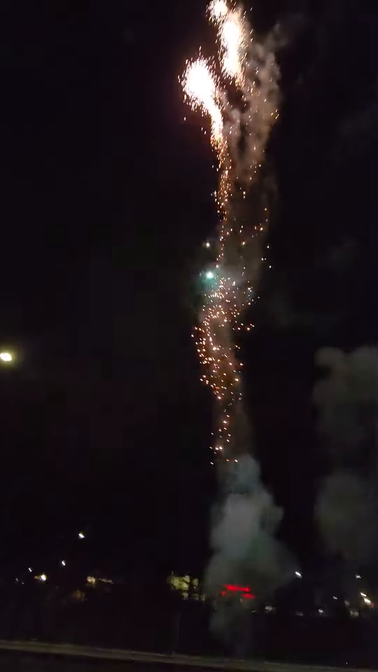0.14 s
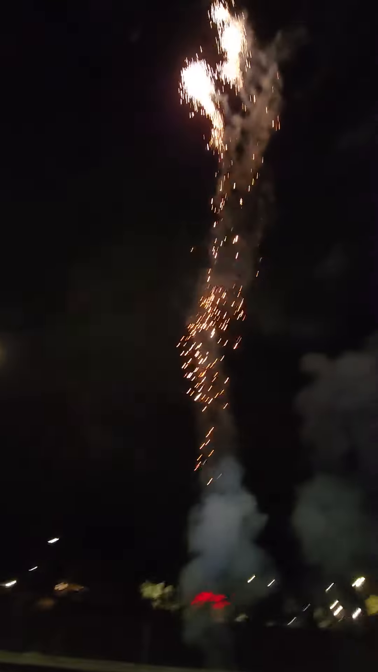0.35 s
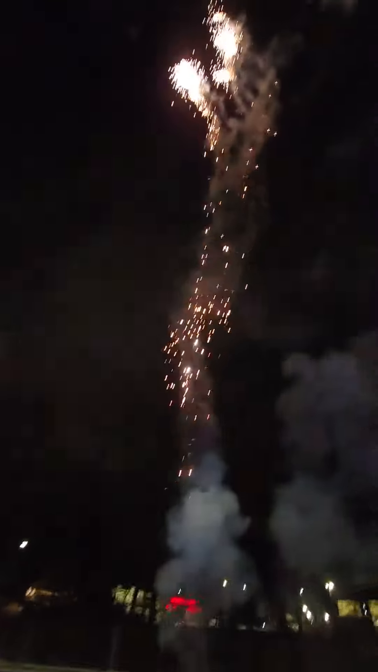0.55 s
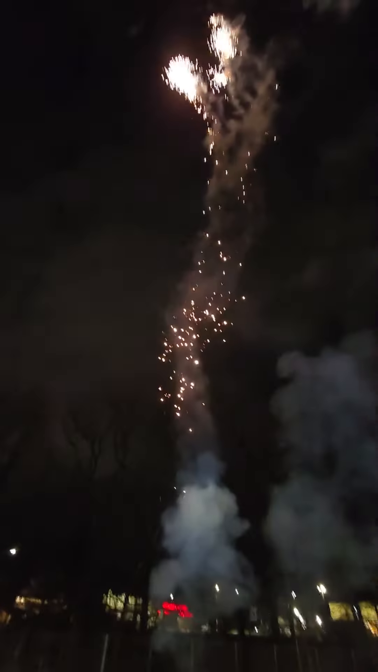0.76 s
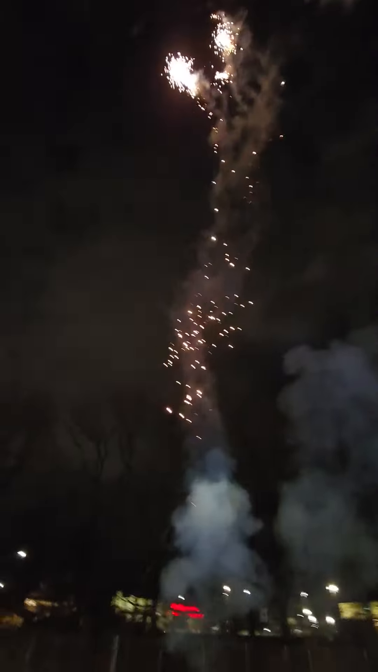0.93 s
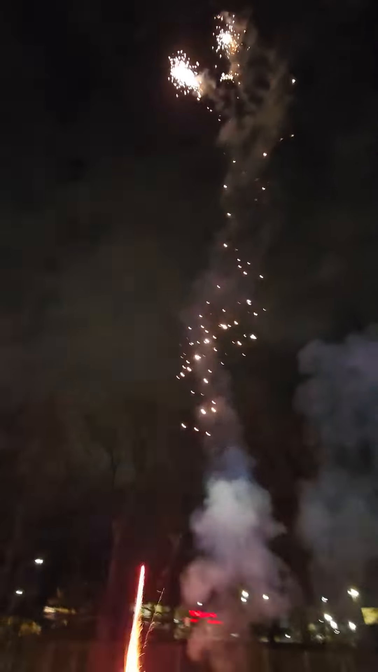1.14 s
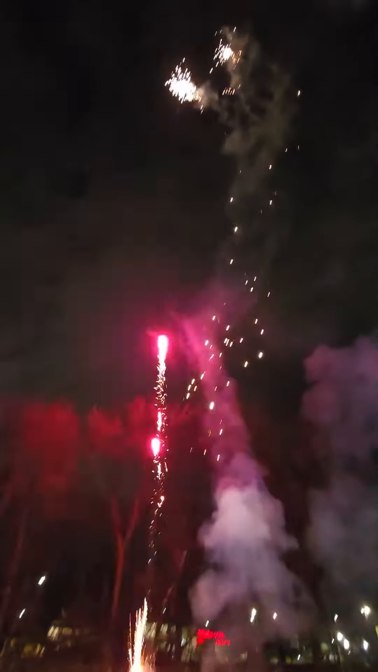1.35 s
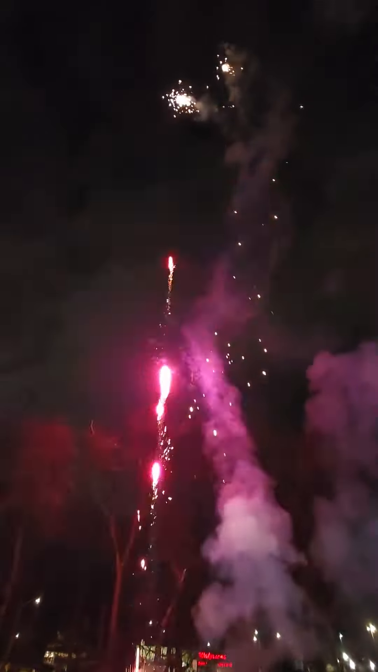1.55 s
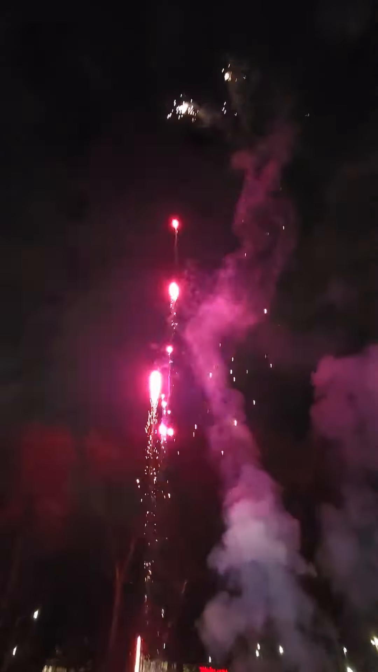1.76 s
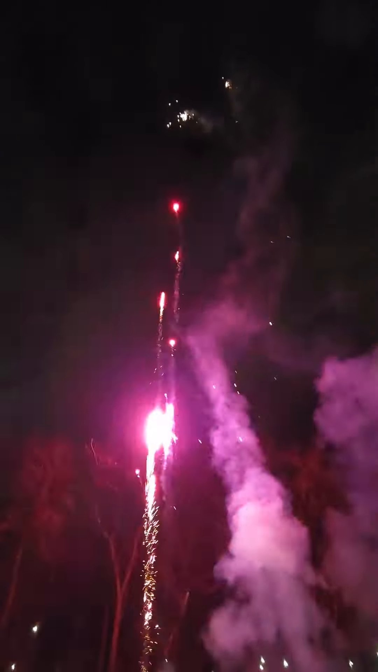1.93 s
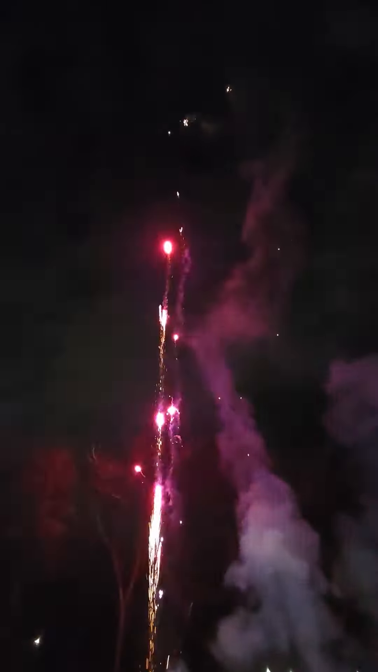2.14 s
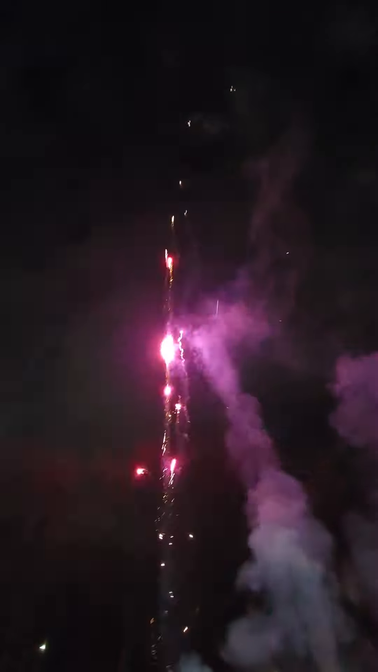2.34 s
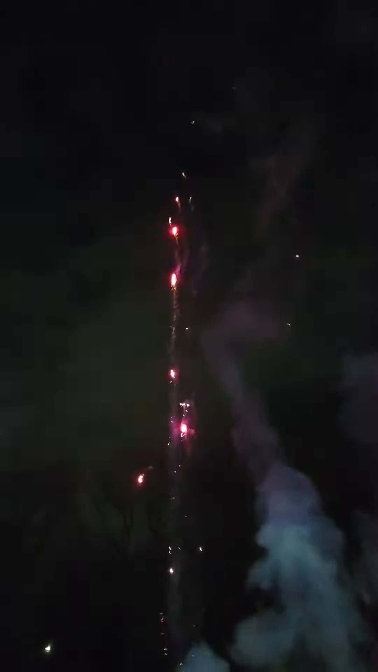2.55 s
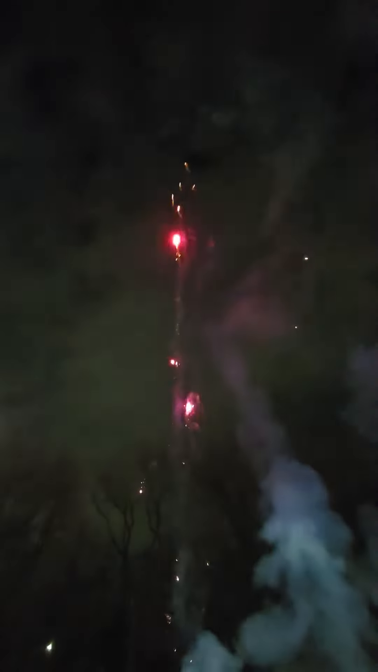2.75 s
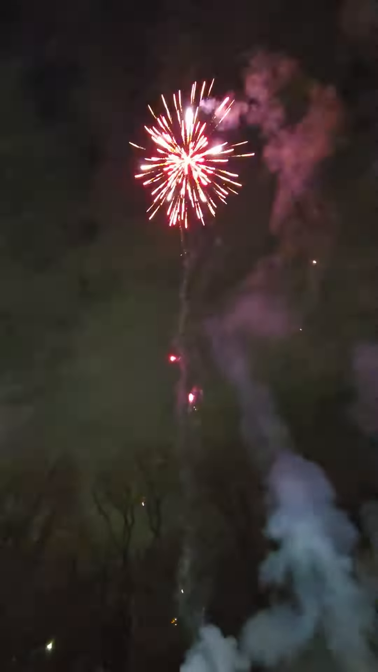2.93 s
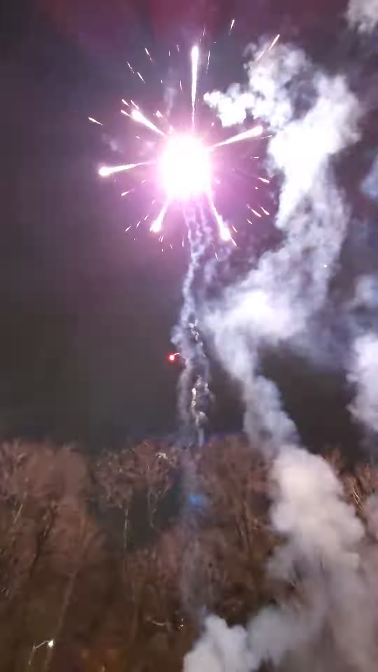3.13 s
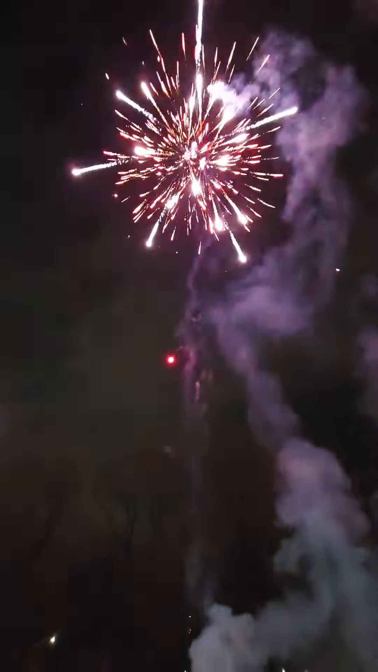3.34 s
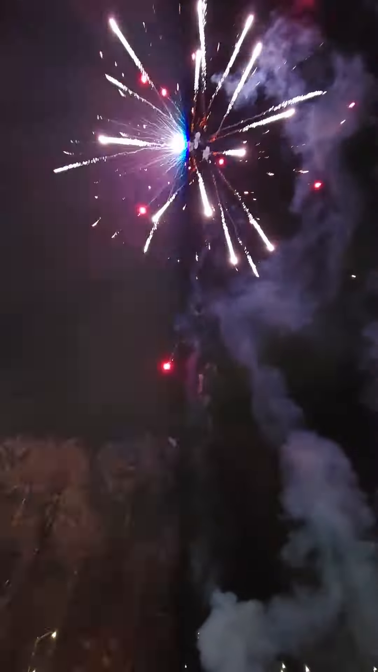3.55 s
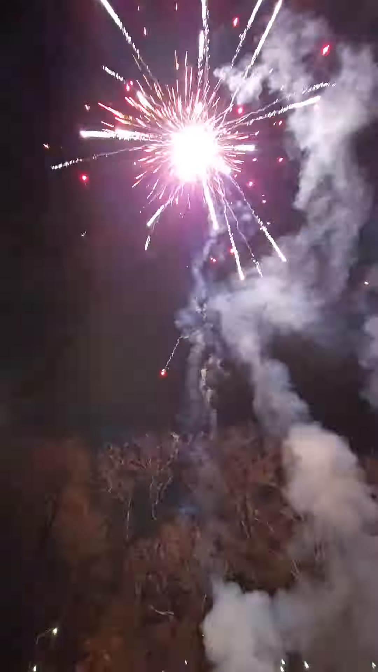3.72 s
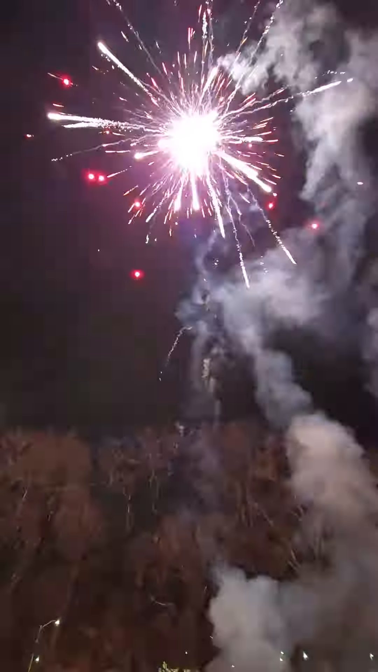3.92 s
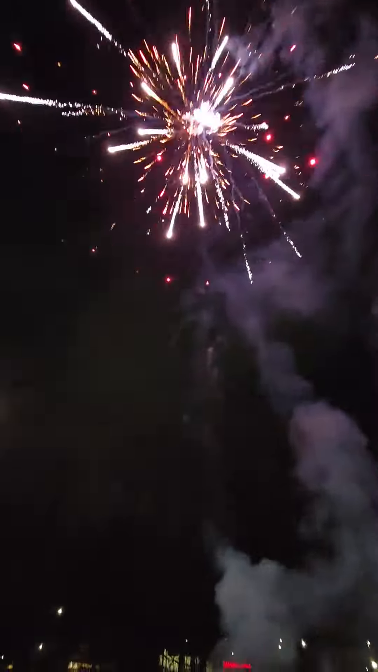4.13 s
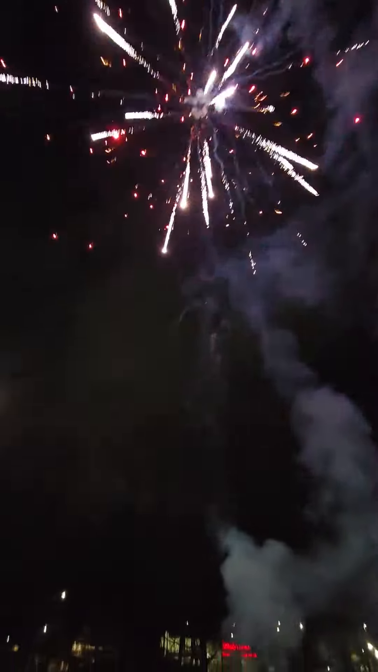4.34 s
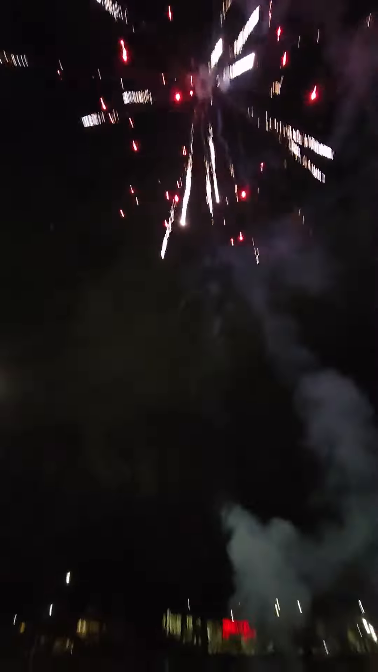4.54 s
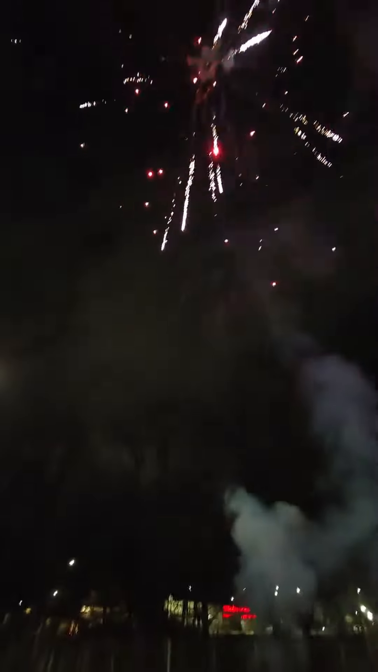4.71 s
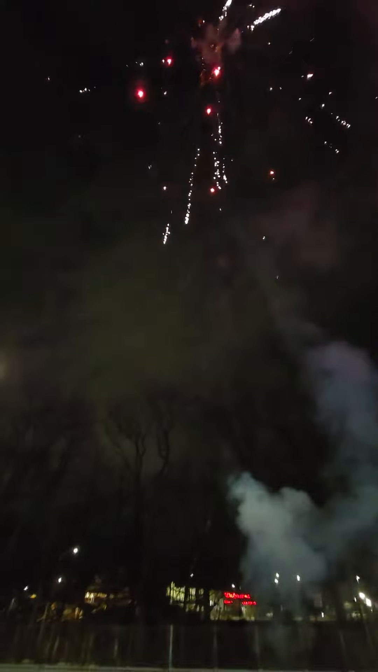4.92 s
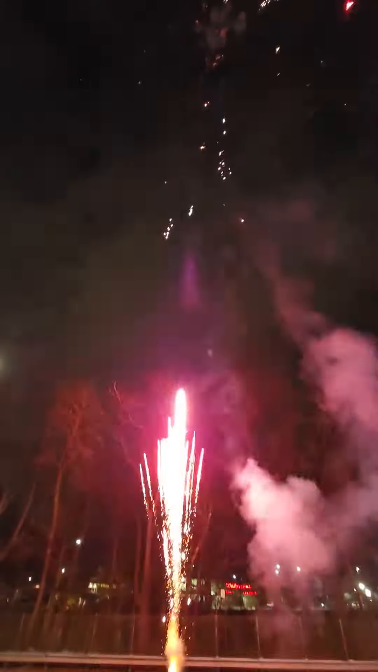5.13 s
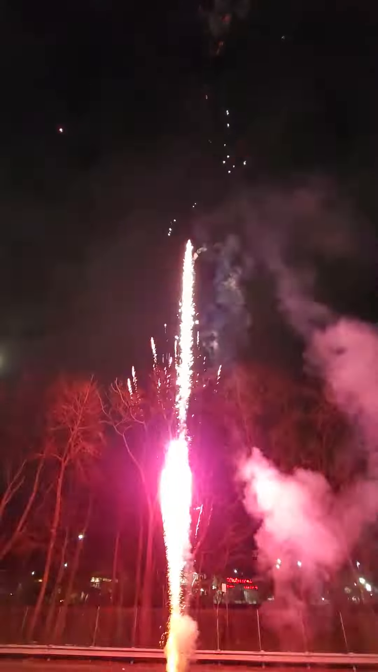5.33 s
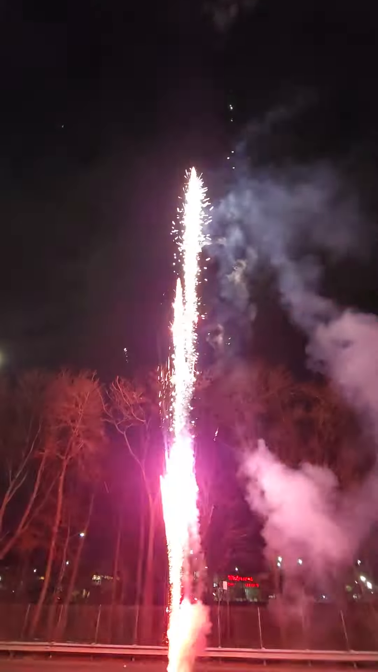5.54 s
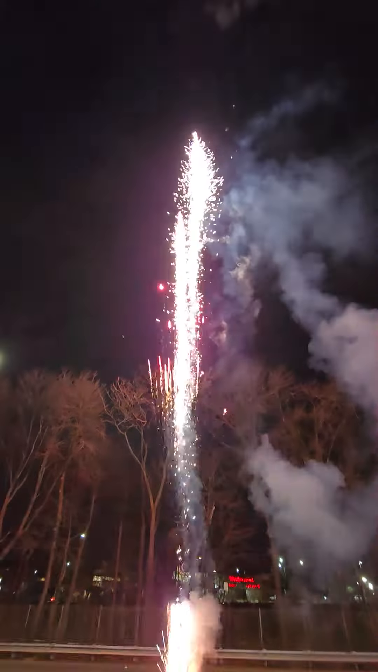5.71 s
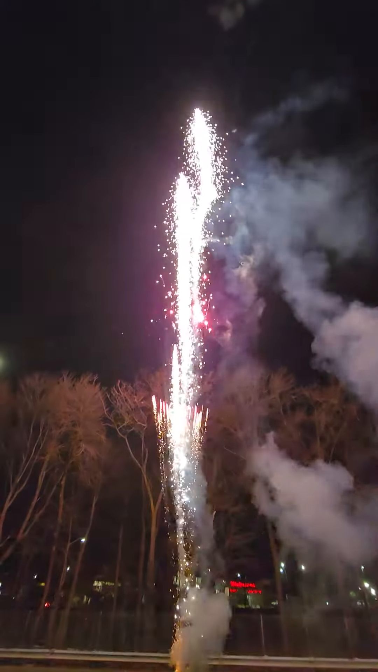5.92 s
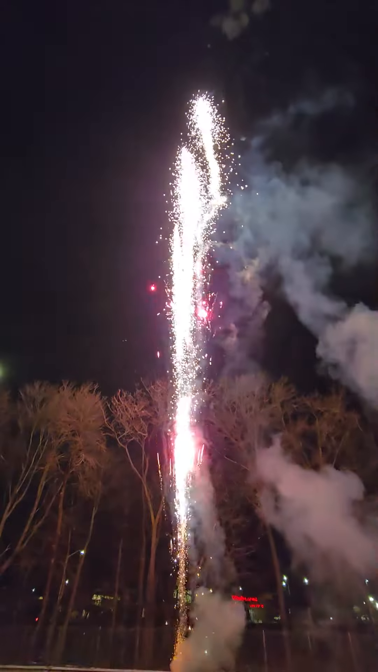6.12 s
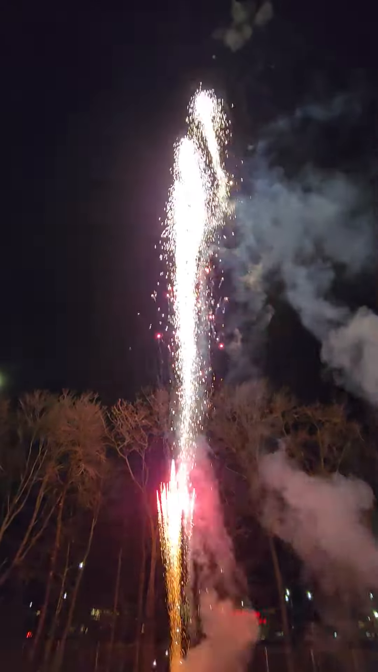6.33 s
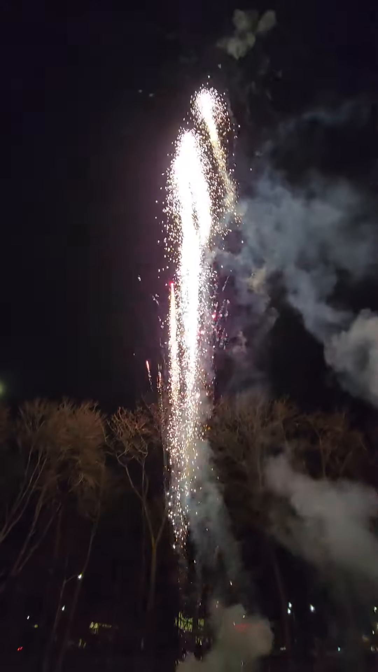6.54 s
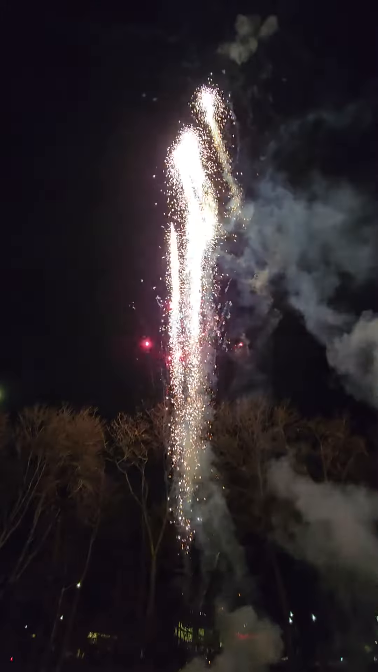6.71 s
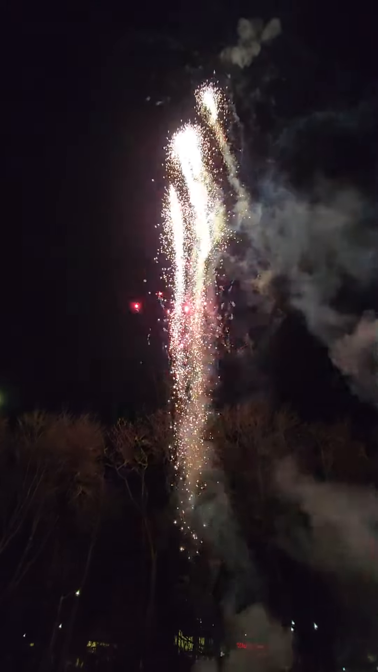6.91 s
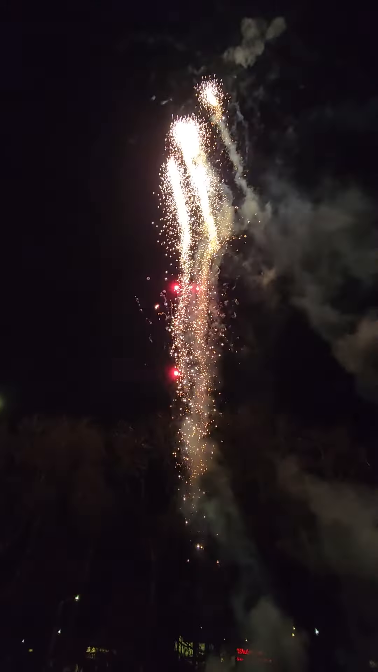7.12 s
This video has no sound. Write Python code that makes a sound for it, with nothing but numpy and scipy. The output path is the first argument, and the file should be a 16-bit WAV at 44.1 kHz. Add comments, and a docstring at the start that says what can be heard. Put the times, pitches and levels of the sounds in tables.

```python
"""A spray of sparks hisses and burns out at night beside a tree-lined street; shells leave their tubes and burst
overhead with a rolling echo; then six comets are fired, whose trails catch one by one and swell into a hissing fountain.
Every report is a blast wave with ragged cracks, a few distinct reflections and a diffuse tail of noise bands.
Sparks are coloured noise with ticks and pops; low-passed rumble, a puff of wind and a distant town lie beneath."""
import sys
import numpy as np
from scipy import signal
from scipy.fft import rfft, irfft
from scipy.io import wavfile

SR = 44100
rng = np.random.default_rng(int(sys.argv[2]) if len(sys.argv) > 2 else 0)


def bounce(signal):
    """Save signal as a 16-bit WAV file at the path given by the first command-line argument."""
    frames = np.transpose(np.atleast_2d(signal))
    limited = np.clip(frames, -1, 1)
    pcm = np.round(limited * 32767).astype(np.int16)
    wavfile.write(sys.argv[1], SR, pcm)


N = 320607
TIME = np.arange(N) / SR
EDGES = np.geomspace(22, 17000, 29)   # about a third of an octave apart
CENTRES = np.sqrt(EDGES[1:] * EDGES[:-1])
CUTOFF_HZ, HISS_DB = 16000, -77   # top of the spectrum; self-noise of the microphones

# In every colour table, density is the spectral density level before the sound is scaled to its level.
# Distant town [f/Hz, density/dB]
TOWN_COLOUR = [(59, -43), (100, -22), (210, -4.5), (335, -13), (2040, -19.5), (2900, -33), (5770, -41.5),
               (16000, -59)]
TOWN_DB = -52.5
# Low rumble [f/Hz, density/dB]
RUMBLE_COLOUR = [(25, 6), (45, 6.5), (70, 16.5), (100, 3.5), (160, -40), (400, -31), (16000, -86.5)]
# Rumble of the town, of the spray at full burn (with the share of its fading followed), and after each burst
TOWN_RUMBLE_DB, SPRAY_RUMBLE_DB, RUMBLE_FOLLOWS = -64, -47, 0.35
ROLL_DB, ROLL_BUILD_S, ROLL_T60_S = -45.5, 0.18, 4.4
# Puff of wind on the microphone [f/Hz, density/dB]
GUST_COLOUR = [(22, 8), (33, 0.5), (50, -6), (90, -17.5), (200, -26), (600, -57), (16000, -110)]
GUST_S, GUST_DB, GUST_ATTACK_S, GUST_HOLD_S, GUST_T60_S = 0.296, -32, 0.017, 0.18, 0.27

# Stereo width of diffuse sound [f/Hz, side minus mid level/dB]
WIDTH = [(40, -10.5), (130, -19.5), (260, -13), (500, -6), (1000, 3.5), (1600, 1), (2500, 0), (5000, 0.5),
         (16000, 0)]
# Stereo balance of diffuse sound [f/Hz, left minus right level/dB]
LEAN = [(40, -1), (130, -1), (300, 0), (1000, -0.5), (2200, -2), (4000, 1.4), (8000, 1.7), (16000, -0.5)]
# Reverberation of the street, before each volley's linger factor [f/Hz, t60/s]
NEAR_T60 = [(50, 1.8), (250, 0.55), (700, 0.92), (2200, 0.8239), (5000, 0.53), (9000, 0.42), (16000, 0.41)]
# Reverberation of the next rows of trees [f/Hz, t60/s]
MIDDLE_T60 = [(100, 0.8), (1000, 2.06), (2200, 1.65), (5000, 1.1), (16000, 0.41)]
MIDDLE_DB = -18   # against the street
# Reverberation from far away [f/Hz, t60/s]
FAR_T60 = [(50, 3.8), (300, 3.46), (1000, 5.35), (2500, 2.66), (5000, 0.96), (9000, 0.69), (16000, 0.63)]
# Spectral balance of the far roll, to which each volley adds its own level [f/Hz, level/dB]
FAR_DB = [(50, 10.5), (150, 13.5), (400, -6.5), (1000, -5.5), (2500, -4), (3500, 2), (6000, 12.5),
          (16000, -3)]
# Pitch of the echoes of shots from the street [f/Hz, width/Hz, level/dB]
STREET_RING = (240, 18, 5.4)
# Pitch of the echoes of bursts in the sky [f/Hz, width/Hz, level/dB]
SKY_RING = (415, 17, 3.1)
# Resonances of the right microphone port [f/Hz, width/Hz, level/dB]
PORT = [(2150, 174, 5), (3030, 290, 1)]
# Diffuse tails of lifts [f/Hz, density/dB]
LIFT_COLOUR = [(21, -40), (35, -18.5), (86, -12.5), (125, -5.5), (200, 0), (265, -0.5), (350, -5),
               (590, -11), (1000, -12), (1350, -17), (1850, -16), (2200, -19.5), (2600, -20), (3700, -20),
               (13000, -32.5), (16000, -38)]
# Diffuse tails of bursts [f/Hz, density/dB]
BURST_COLOUR = [(21, -52), (35, -31), (115, -17), (165, -11), (215, -6), (389, 1), (520, -6.5), (758, -16),
                (930, -10), (1170, -18.5), (1480, -15), (1860, -19.5), (2220, -20.5), (2660, -24),
                (4010, -26), (5740, -36), (14800, -34), (16000, -41)]
# Diffuse tails of comet shots [f/Hz, density/dB]
COMET_COLOUR = [(35, -24), (100, -10.5), (170, -2.5), (260, 0.5), (400, -10), (750, -8.5), (1300, -19.5),
                (2300, -18.5), (4000, -23), (7000, -34), (16000, -40)]

# Directional parts of the spark hiss [level/dB against the diffuse hiss, right ear lag/s]
HISS_PATHS = [(-11.5, -0.0036), (-11.5, -.00045)]
# First spray [f/Hz, density/dB]
SPRAY_COLOUR = [(60, -49), (125, -24.5), (177, -6.5), (270, -15), (358, -5.5), (430, -11), (600, -7),
                (1100, -5), (2100, -2), (2950, 1), (4000, -5), (6000, -6.5), (9000, -10.5), (16000, -22.5)]
# Burn of the first spray before its gain and burnout [t/s, level/dB]
SPRAY_BURN = [(0.0, -26), (0.142, -25), (0.158, -27.5), (0.26, -26.5), (0.73, -28.5), (0.746, -28),
              (0.828, -31.5), (0.832, -30), (1.042, -30.5), (1.062, -35), (1.076, -28.5), (1.144, -31.5),
              (1.152, -30), (1.22, -33)]
# Late bounce of the spray off the road [delay/s, level/dB, top f/Hz]
ROAD_BOUNCE = (.0056, -9, 710)
# Thinning sets the dulling, sputter, pops and rumble; burnout also lowers the hiss itself
SPRAY_GAIN_DB, SPRAY_HOLD_S, SPRAY_THIN_DB_PER_S = 3, 0.17, 3
BURNOUT_S, BURNOUT_DB_PER_S = 1.22, 38
SPRAY_TILT_DB, SPRAY_DULLING = -0.8, 0.3   # dB per octave at full burn; dB per octave lost per dB of fading
SPUTTER_DB_PER_DB, SPUTTER_PER_S = 0.54, 58   # the thinner the spray, the more unevenly it burns
SNAP_COUNT, SNAP_DB, SNAP_SPREAD_DB = 12, -24, 6   # larger grains: number, mean level at full burn, spread
# Comet fountain [f/Hz, density/dB]
FOUNTAIN_COLOUR = [(60, -22), (110, -27), (170, -6), (230, -10), (350, -5), (600, -4.5), (950, -3),
                   (1500, -0.5), (2150, -2), (2600, 0), (3300, 1.5), (5000, -4.5), (9000, -4.5),
                   (16000, -12)]
# A faint trail hisses thin and bright, a full fountain broader [level/dB, brightness/dB per octave]
TRAIL_TILT = [(-39, 1), (-18.5, -1)]
# A comet spits as it lights; its trail then catches, reaches full burn and slowly wanes
SPIT_DB, SPIT_FADE_DB_PER_S = -45.5, 64
CATCH_S, CATCH_DB_PER_S, WANE_DB_PER_S = 0.62, 69.5, 1
# Roar of the first shell as it climbs [f/Hz, density/dB]
ROAR_COLOUR = [(100, -23), (400, 9.5), (700, 0), (1300, 2), (2200, -13), (5000, -20), (16000, -31)]
ROAR_S, ROAR_ATTACK_S, ROAR_HOLD_S, ROAR_T60_S, ROAR_DB = 1.248, 0.025, 0.089, .25, -22.5

# Low thumps near the first report of each volley [t/s, 1/e half-width/s, left height, right height]
THUMPS = [(1.2273, 0.0036, -0.019, 0.33), (1.233, 0.001, -0.09, -0.5), (3.0381, 0.00076, -0.2, -0.45),
          (3.047, 0.0013, 0.027, 0.1), (5.1198, 0.00082, 0.11, 0.36)]
# Shells leaving their tubes, and one small crack after the first; a larger size booms lower
# [t/s, blast level/dB, crack level/dB, tail level/dB, tail brightness/dB per octave, size]
LIFTS = [(1.2359, -4.5, -8, -13, 1.16, 1.02), (1.3135, -26, -13.5, -24.5, -6, 1.5),
         (1.437, -2, -13, -13.5, 0, 0.97), (1.6576, -4.5, -10, -14.5, 0, 1.02),
         (1.846, -3.5, -11.5, -16.5, -0.5, 0.98), (1.9008, -6, -9.5, -18, 0.5, 1.12),
         (2.118, -4, -10, -18.5, 0.1, 1.1)]
# Shells bursting overhead
# [t/s, blast level/dB, crack level/dB, tail level/dB, tail brightness/dB per octave, size]
BURSTS = [(3.0409, -5.5, -22, -14.5, 0.5, 1.13), (3.343, -2.5, -20, -18.5, 1.5, 0.98),
          (3.3686, -0.5, -17.5, -18.5, 0.5, 1), (3.843, -3.5, -15, -18.5, 1, 1.04),
          (3.9728, -1, -14.5, -18.5, 0.5, 0.98), (4.187, -2.5, -15.5, -19, 0.5, 0.95)]
# Comets leaving their tubes
# [t/s, blast level/dB, crack level/dB, tail level/dB, tail brightness/dB per octave, size, trail hiss level/dB]
COMETS = [(5.1149, -9, -15.5, -28, 2, 1.1, -30.5), (5.345, -4, -21.5, -28, 0, 1.07, -31),
          (5.5716, -2.5, -17.5, -24.5, 0, 1.03, -26), (5.8193, -3, -18.5, -22.5, -0.5, 1.06, -27.5),
          (6.083, -4.5, -15.5, -22.5, 0, 1.05, -28), (6.3531, -1.5, -15, -21.5, 0.5, 0.87, -43)]
# Paths of lifts to the listener
# [delay/s, blast level/dB, top f/Hz, crack level/dB, crack t60/s, right ear lag of the blast/s]
LIFT_PATHS = [(0, -7, 6060, -7, 0.03, -.00038), (.0033, -18, 2000, -12, 0.017, -.0003),
              (0.0145, -28, 2490, -4, 0.037, -.0002), (0.017, -12, 2500, -3.5, .02, .0003),
              (.0365, -9.5, 1100, -13, 0.046, -.0003)]
# Paths of bursts
# [delay/s, blast level/dB, top f/Hz, crack level/dB, crack t60/s, right ear lag of the blast/s]
BURST_PATHS = [(0, -1.5, 7000, 1.5, 0.0082, .00033), (.0058, -4.5, 5000, 8.5, 0.0081, -.0003),
               (0.0111, -2.5, 696, -13, .02, .0003), (0.024, -14, 4000, -7, 0.0065, .0002),
               (0.0301, -14.5, 1000, -5, .012, -.0002), (.0415, -7.5, 1220, -32, 0.019, -.0002),
               (0.55, -36, 400, -46, 0.027, .0003)]
# Paths of comet shots
# [delay/s, blast level/dB, top f/Hz, crack level/dB, crack t60/s, right ear lag of the blast/s]
COMET_PATHS = [(0, -8.5, 9000, -1, 0.026, -.0003), (0.0157, -18.5, 2500, -1, 0.024, .0002)]
# Ringing set off by a lift, before stretching by size [f/Hz, level/dB, t60/s]
LIFT_RINGS = [(250, 4, 0.028), (512, -46, 0.019), (2300, -27, 0.02)]
# Ringing set off by a burst, before stretching by size [f/Hz, level/dB, t60/s]
BURST_RINGS = [(342, -6, 0.023), (420, -16.5, 0.079), (960, -15, 0.033), (2020, -18.5, 0.017)]
# Ringing set off by a comet shot, before stretching by size [f/Hz, level/dB, t60/s]
COMET_RINGS = [(247, 4, 0.027), (573, -11, 0.034), (870, -22, 0.015), (3120, -17, 0.011)]
# Cracks of bursts and pops of large grains [f/Hz, density/dB]
CRACK_COLOUR = [(200, -7), (600, 14), (1200, 3), (2100, 7), (3200, 1), (4500, -2), (7000, -16), (11000, -9),
                (16000, -9.5)]
# Cracks of lifts, ringing in the tube [f/Hz, density/dB]
TUBE_CRACK_COLOUR = [(200, -18), (600, 9.5), (1300, -22), (1750, 4.5), (2200, 12), (2700, -3), (4000, -5.5),
                     (7000, -12), (11000, -16), (16000, -16)]
# Cracks of comet shots [f/Hz, density/dB]
COMET_CRACK_COLOUR = [(200, -4), (650, 17), (1200, -7), (2100, 8), (3200, 6), (4500, -1), (7000, -8),
                      (11000, -10.5), (16000, -10)]


def from_db(db):
    """Level: an amplitude gain is ten to the power of a twentieth of the decibels."""
    return 10 ** (np.asarray(db) / 20)


def rms_one(x):
    """Normalization: a signal divided by its root mean square has unit rms."""
    return x / np.sqrt(np.mean(x ** 2) + 1e-20)


def at_hz(points, hz):
    """Interpolation: a table is read linearly on a logarithmic frequency axis."""
    hz_points, values = np.array(points).T
    return np.interp(np.log(hz), np.log(hz_points), values)


def cut(x, hz, kind, order):
    """Filtering: a Butterworth response passes one band with a maximally flat top."""
    sos = signal.butter(order, np.clip(hz, 10, .45 * SR), kind, fs=SR, output="sos")
    return signal.sosfilt(sos, x)


def resonate(x, hz, width_hz, db):
    """Resonance: a tuned peak lifts one narrow band."""
    peak = signal.lfilter(*signal.iirpeak(hz, hz / width_hz, fs=SR), x)
    return x + (from_db(db) - 1) * peak


def drift(rate):
    """Random modulation: Gaussian knots, `rate` a second, are joined by lines and scaled to unit rms."""
    knots = rng.standard_normal(16384)
    return rms_one(np.interp(TIME * rate, np.arange(len(knots)), knots))


def since(s):
    """Elapsed time: seconds gone by since time s, zero before it."""
    return np.maximum(TIME - s, 0)


def add(out, s, sound):
    """Superposition: a sound is summed into a track at time s."""
    i = max(int(round(s * SR)), 0)
    out[..., i:i + sound.shape[-1]] += sound[..., :N - i]


def air_bands():
    """Interaural coherence: noise bands are alike in both ears in the bass and nearly unrelated in the treble."""
    white, bands = rng.standard_normal((2, 2, N + 8192)), []
    for k, hz in enumerate(CENTRES):
        settled = cut(white[k % 2], EDGES[k:k + 2], "band", order=3)[:, 8192:]   # drop the filter's onset
        mid, side = settled
        pair = mid + from_db(at_hz(WIDTH, hz)) * side * [[1], [-1]]
        balance = from_db(at_hz(LEAN, hz) * np.array([[.5], [-.5]]))
        bands.append(rms_one(pair * balance))
    return bands


def band_gains(colour):
    """Spectral density: a band's amplitude is its density times the root of its width, here to unit total rms."""
    gains = from_db(at_hz(colour, CENTRES)) * np.sqrt(CENTRES)
    return gains / np.linalg.norm(gains)


def wash(bands, colour):
    """Band synthesis: weighted noise bands add up to steady noise of one colour."""
    return sum(gain * band for gain, band in zip(band_gains(colour), bands))


def spray_fade():
    """Decay: decibels of fading accumulate through thinning and burnout, after an initial hold."""
    return SPRAY_THIN_DB_PER_S * since(SPRAY_HOLD_S) + BURNOUT_DB_PER_S * since(BURNOUT_S)


def rumble_level():
    """Power addition: the rumbles of town, spray and far-rolling bursts are summed as powers."""
    power = from_db(TOWN_RUMBLE_DB) ** 2 + from_db(SPRAY_RUMBLE_DB - RUMBLE_FOLLOWS * spray_fade()) ** 2
    for s, *_ in BURSTS:
        age = since(s)
        build = 1 - np.exp(-age / ROLL_BUILD_S)
        power = power + (from_db(ROLL_DB - 60 * age / ROLL_T60_S) * build) ** 2
    return np.sqrt(power)


def gust_level():
    """Wind-noise envelope: the puff rises quickly, holds and decays exponentially."""
    attack = np.minimum(since(GUST_S) / GUST_ATTACK_S, 1)
    return attack * from_db(GUST_DB - 60 * since(GUST_S + GUST_HOLD_S) / GUST_T60_S)


def tails(bands, shots, colour, build_s, linger, far_db, clump_db=1.6):
    """Diffuse reverberation: near, middle and far scatterers decay at frequency-dependent rates."""
    s, _, _, tail_db, brightness, *_ = np.transpose(shots)[..., None]
    t, out = TIME[::32], 0   # coarse time grid for the envelopes
    age = np.maximum(t - s, 0)
    start = from_db(tail_db) * (1 - np.exp(-age / build_s))
    lumps = from_db(clump_db * drift(rate=21)[::32])   # far echoes come back in clumps
    for band, gain, hz in zip(bands, band_gains(colour), CENTRES):
        tint = from_db(brightness * np.log2(np.clip(hz, 150, 3000) / 400))
        near = from_db(-60 * age / (linger * at_hz(NEAR_T60, hz)))
        middle = from_db(MIDDLE_DB - 60 * age / at_hz(MIDDLE_T60, hz))
        far = lumps * from_db(far_db + at_hz(FAR_DB, hz) - 60 * age / at_hz(FAR_T60, hz))
        power = (start * tint) ** 2 * (near ** 2 + middle ** 2 + far ** 2)
        level = np.sqrt(np.sum(power, axis=0))
        out = out + gain * np.interp(TIME, t, level) * band
    lows = cut(out, 500, "low", order=1)
    ragged = rms_one(from_db(1.16 * drift(rate=450)))   # single trunks and walls stand out of the mass
    return lows + (out - lows) * ragged


def nearby(x, bounce_db, sway_s, count):
    """Comb filtering: close surfaces return the midrange 2-16 ms late; the hand-held microphone sways."""
    out = x.copy()
    for ear in range(2):
        midrange = cut(x[ear], [500, 3000], "band", order=1)
        for delay in rng.uniform(.002, .016, count):
            moving_delay = delay + sway_s * drift(rate=1)
            out[ear] += from_db(bounce_db) * np.interp(TIME - moving_delay, TIME, midrange)
    return out


def overhead_hiss(bands):
    """Interaural delay: two independent noises, each earlier in the right ear, join the diffuse bands."""
    heard = np.zeros((2, 2, N))   # source set, ear, sample
    for db, lag in HISS_PATHS:
        source = from_db(db) * rng.standard_normal((2, N))
        add(heard[:, 0], -lag, source)
        add(heard[:, 1], lag, source)   # a negative time starts at zero
    share, joined = heard.std(), []
    for k, band in enumerate(bands):
        directional = rms_one(cut(heard[k % 2], EDGES[k:k + 2], "band", order=2))
        joined.append(rms_one(band + share * directional))
    return joined


def off_road(x, delay, db, top_hz):
    """Specular reflection: sound from overhead is joined by its delayed, low-passed bounce off the road."""
    out = x.copy()
    add(out, delay, from_db(db) * cut(x, top_hz, "low", order=1))
    return out


def sparks(bands, burn, colour, flutter_db, sizzle_db):
    """Incoherent summation: countless burning grains merge into noise that flutters and sizzles in the treble."""
    level_db, brightness = burn
    body, treble = np.zeros((2, N)), np.zeros((2, N))
    for band, gain, hz in zip(bands, band_gains(colour), CENTRES):
        layer = treble if hz > 1500 else body
        layer += gain * band * from_db(brightness * np.log2(max(hz, 500) / 3000))
    sizzle = rms_one(from_db(sizzle_db * drift(rate=1200)))
    return (body + treble * sizzle) * from_db(level_db + flutter_db * drift(rate=40))


def glitter(burn, per_s, db, low_hz, top_hz):
    """Shot noise: the nearest grains are random ticks of uneven size whose level follows the burn."""
    sizes_db = 4 * np.minimum(rng.exponential(1, (2, N)), 4)
    sizes = from_db(sizes_db) * rng.choice([-1, 1], (2, N))
    clicks = sizes * (rng.random((2, N)) < per_s / SR) + 1e-18
    ticks = cut(cut(clicks, low_hz, "high", order=2), top_hz, "low", order=2)
    return from_db(burn[0] + db) * rms_one(ticks)


def spray_burn():
    """Burning rate: level/dB and brightness/dB per octave of a spray that dulls and sputters as it thins."""
    thinness = np.minimum(spray_fade(), 10)
    sputter = SPUTTER_DB_PER_DB * thinness * drift(rate=SPUTTER_PER_S)
    table_db = np.interp(TIME, *np.transpose(SPRAY_BURN))
    level_db = SPRAY_GAIN_DB + table_db - BURNOUT_DB_PER_S * since(BURNOUT_S)
    return level_db + sputter, SPRAY_TILT_DB - SPRAY_DULLING * thinness


def fountain_burn():
    """Power addition: comet trails sum to a fountain, given as level/dB and brightness/dB per octave."""
    power = 1e-14
    for s, *_, hiss_db in COMETS:
        age = since(s)
        spit = from_db(SPIT_DB - SPIT_FADE_DB_PER_S * age)
        catching_db = CATCH_DB_PER_S * np.maximum(CATCH_S - age, 0)
        trail = from_db(hiss_db - catching_db - WANE_DB_PER_S * since(s + CATCH_S))
        power = power + (age > 0) * (spit ** 2 + trail ** 2)
    level_db = 10 * np.log10(power)
    return level_db, np.interp(level_db, *np.transpose(TRAIL_TILT))


def roar_level():
    """Envelope of the roar: a linear swell, a brief hold and exponential decay."""
    attack = np.minimum(since(ROAR_S) / ROAR_ATTACK_S, 1)
    return attack * from_db(ROAR_DB - 60 * since(ROAR_S + ROAR_HOLD_S) / ROAR_T60_S)


def crack(colour, t60):
    """Transient noise: a coloured burst, independent in each ear, decays exponentially."""
    hz = np.fft.rfftfreq(2048, 1 / SR) + 1
    noise = irfft(rfft(rng.standard_normal((2, 2048))) * from_db(at_hz(colour, hz)))
    return rms_one(noise) * from_db(-60 * np.arange(2048) / SR / t60)


def snaps(t60, low_hz):
    """Impulsive emission: larger grains pop at random over the life of the spray and fade with it."""
    out, fade = np.zeros((2, N)), spray_fade()
    for k in range(SNAP_COUNT):
        s = BURNOUT_S * (k + rng.random()) / SNAP_COUNT
        db = SNAP_DB + SNAP_SPREAD_DB * rng.normal() - np.interp(s, TIME, fade)
        add(out, s, from_db(db) * cut(crack(CRACK_COLOUR, t60), low_hz, "high", order=2))
    return out


def thumps():
    """Low thumps: brief Gaussian swings of either sign, unequal in the two ears."""
    swings = 0
    for s, width, left, right in THUMPS:
        swings = swings + np.outer([left, right], np.exp(-((TIME - s) / width) ** 2))
    return swings


def blast(push_s, low_hz, rings):
    """Blast wave: a shock front relaxes into suction, thinned in the bass, with decaying modes behind it."""
    t = TIME[:4096]
    wave = cut((1 - t / push_s) * np.exp(-t / push_s), low_hz, "high", order=4)
    for hz, db, t60 in rings:
        wave = wave + from_db(db - 60 * t / t60) * np.cos(2 * np.pi * hz * t)
    return wave


def trunks(shots, push_s, low_hz, db, first_s, spread_s, t60, count):
    """Scattering: trunks and posts return thin shocks in a crackle whose pattern a volley's shots share."""
    delays = first_s + spread_s * (np.arange(count) + rng.random(count)) / count
    levels = db - 60 * delays / t60 + 3 * rng.standard_normal(count)
    lags = rng.uniform(-.0004, .0004, count)
    clicks = np.zeros((2, N))
    for s, blast_db, *_ in shots:
        arrive = s + delays + rng.normal(0, .0005, count)
        for ear, side in enumerate((-1, 1)):
            samples = ((arrive + side * lags / 2) * SR).astype(int)
            clicks[ear, np.minimum(samples, N - 1)] += from_db(blast_db + levels)
    shock = cut(blast(push_s, low_hz, []), 3500, "low", order=1)
    return signal.oaconvolve(clicks, shock[None], axes=1)[:, :N]


def railing(shots, delay_s, length_s, start_hz, end_hz, db):
    """Periodic scattering: a row of posts answers at widening intervals, as a short falling chirp."""
    u = np.linspace(0, 1, int(length_s * SR))
    phase = 2 * np.pi * np.cumsum(start_hz * (end_hz / start_hz) ** u) / SR
    chirp = np.sin(np.pi * u) * np.sin(phase)
    out = np.zeros((2, N))
    for s, blast_db, *_ in shots:
        add(out, s + delay_s, from_db(blast_db + db) * chirp)
    return out


def reports(shots, paths, crack_colour, wave):
    """Multipath propagation: size-stretched blasts arrive directly and off ground and walls, with cracks."""
    out = np.zeros((2, N))
    steps = np.arange(len(wave))
    for s, blast_db, crack_db, _, _, size, *_ in shots:
        stretched = np.interp(steps / size, steps, wave)
        for delay, path_db, top_hz, scatter_db, t60, lag in paths:
            arrival = from_db(blast_db + path_db) * cut(stretched, top_hz, "low", order=1)
            add(out[0], s + delay - lag / 2, arrival)
            add(out[1], s + delay + lag / 2, arrival)
            add(out, s + delay, from_db(crack_db + scatter_db) * crack(crack_colour, t60))
    return out


def scene():
    """Superposition: night air, echoes, spark hiss and reports add linearly."""
    echo, air = air_bands(), air_bands()
    rumble = rumble_level() * wash(air, RUMBLE_COLOUR)
    town = from_db(TOWN_DB) * wash(air, TOWN_COLOUR)
    gust = gust_level() * wash(echo, GUST_COLOUR)

    street = tails(echo, LIFTS, LIFT_COLOUR, build_s=0.026, linger=1.045, far_db=-36.0)
    street += tails(echo, COMETS, COMET_COLOUR, build_s=0.0095, linger=0.71, far_db=-24.5)
    # high in the sky, the bursts reach farthest
    sky = tails(echo, BURSTS, BURST_COLOUR, build_s=0.0078, linger=0.81, far_db=-13.5)
    roll = resonate(street, *STREET_RING) + resonate(sky, *SKY_RING)

    overhead = overhead_hiss(air)
    dying, rising = spray_burn(), fountain_burn()
    spray = sparks(overhead, dying, SPRAY_COLOUR, flutter_db=0.4, sizzle_db=2.5)
    spray = off_road(spray, *ROAD_BOUNCE)
    spray += glitter(dying, per_s=300, db=-9.0, low_hz=2700, top_hz=4200)
    fountain = sparks(overhead, rising, FOUNTAIN_COLOUR, flutter_db=0.7, sizzle_db=1.0)
    fountain += glitter(rising, per_s=700, db=-11.5, low_hz=2800, top_hz=4800)
    roar = roar_level() * from_db(3.4 * drift(rate=300)) * wash(air, ROAR_COLOUR)
    diffuse = nearby(roll + spray + fountain + roar, bounce_db=-16.5, sway_s=0.00026, count=5)
    pops = snaps(t60=0.0034, low_hz=2500)

    crackle = trunks(BURSTS, push_s=0.0012, low_hz=330, db=-12, first_s=0.012, spread_s=.13, t60=0.5, count=26)
    crackle += trunks(LIFTS, push_s=0.00047, low_hz=402, db=-20, first_s=0.016, spread_s=.12, t60=0.93, count=22)
    lift_wave = blast(push_s=0.0018, low_hz=136.0, rings=LIFT_RINGS)
    burst_wave = blast(push_s=0.0036, low_hz=166, rings=BURST_RINGS)
    comet_wave = blast(push_s=0.0017, low_hz=144, rings=COMET_RINGS)
    lifts = reports(LIFTS, LIFT_PATHS, TUBE_CRACK_COLOUR, lift_wave)
    bursts = reports(BURSTS, BURST_PATHS, CRACK_COLOUR, burst_wave)
    comets = reports(COMETS, COMET_PATHS, COMET_CRACK_COLOUR, comet_wave)
    comets += railing(COMETS, delay_s=0.028, length_s=.017, start_hz=517, end_hz=257, db=-18.5)
    return rumble + town + gust + diffuse + pops + crackle + thumps() + lifts + bursts + comets


def record(dry):
    """Transduction: the right port resonates, self-noise is added, peaks saturate softly and the top is cut."""
    right = dry[1]
    for port in PORT:
        right = resonate(right, *port)
    ears = np.array([dry[0], right])
    ears += from_db(HISS_DB) * rng.standard_normal((2, N))
    ceiling = .86
    rounded = ears / (1 + (ears / ceiling) ** 4) ** (1 / 4)
    low_pass = signal.ellip(10, .2, 70, CUTOFF_HZ, fs=SR, output="sos")
    return signal.sosfilt(low_pass, rounded)


dry = scene()
out = record(dry)
bounce(out)
```